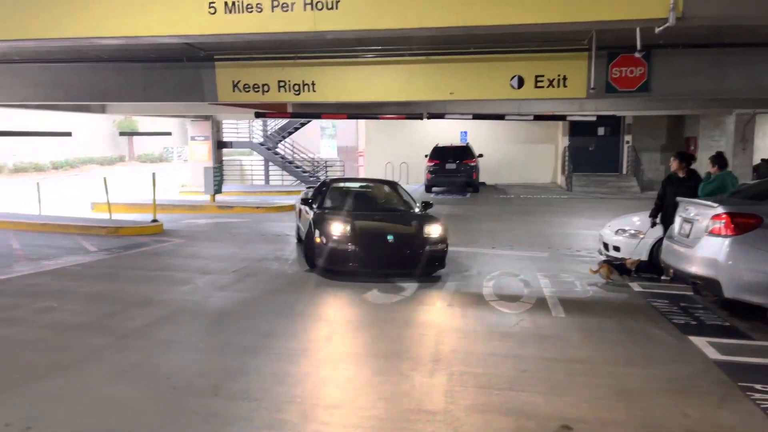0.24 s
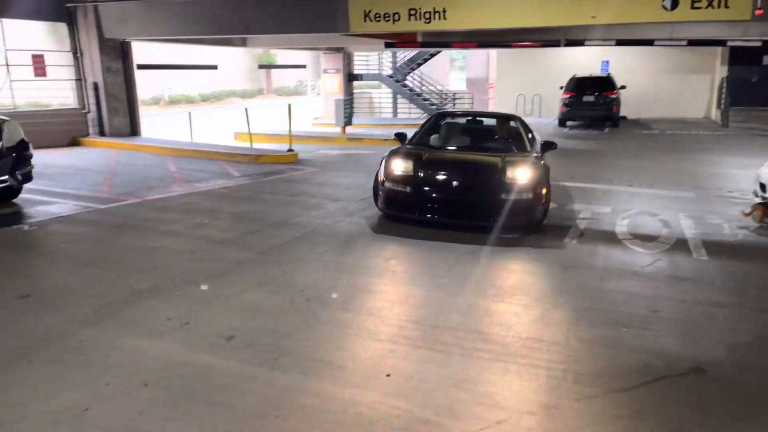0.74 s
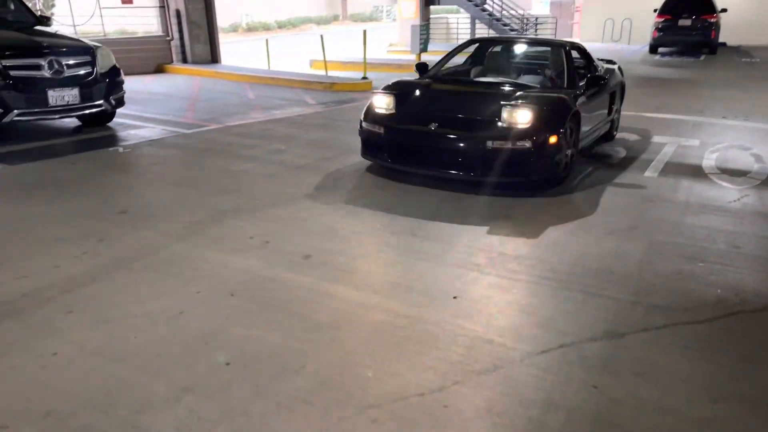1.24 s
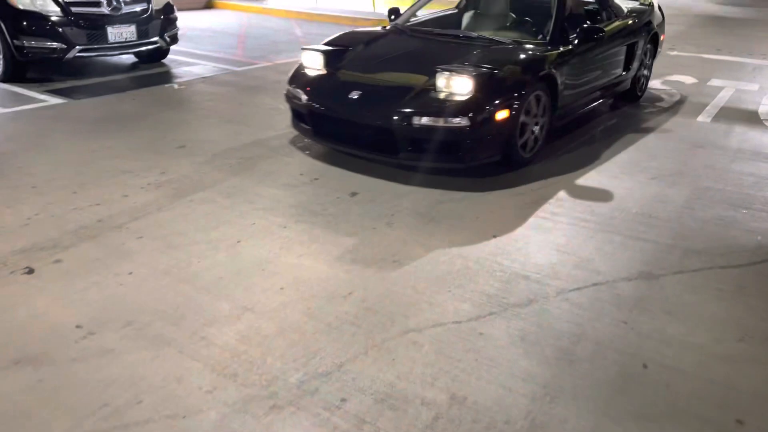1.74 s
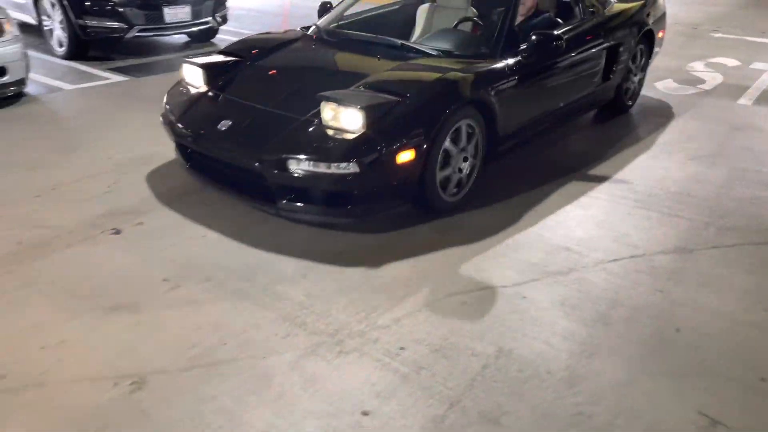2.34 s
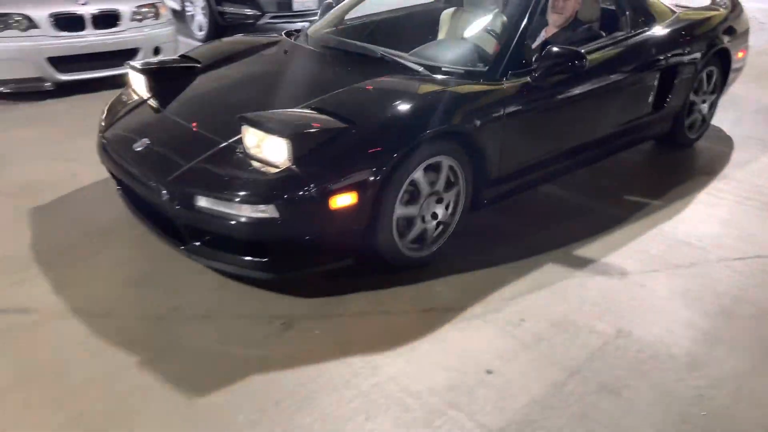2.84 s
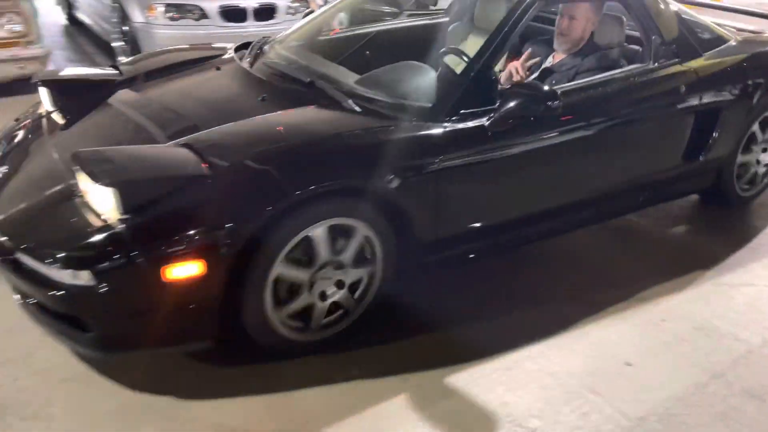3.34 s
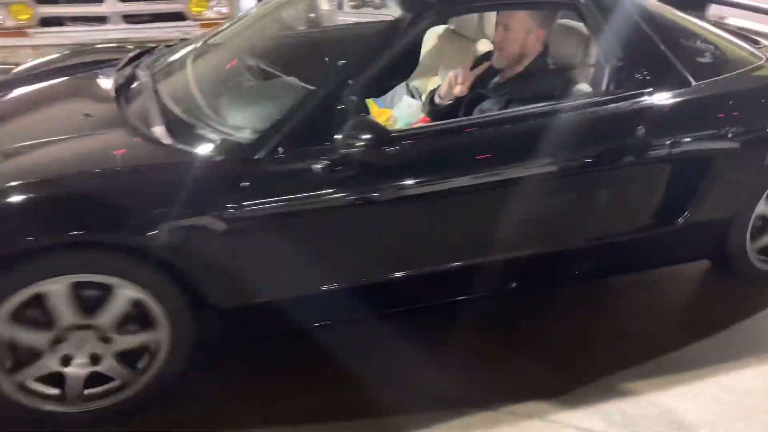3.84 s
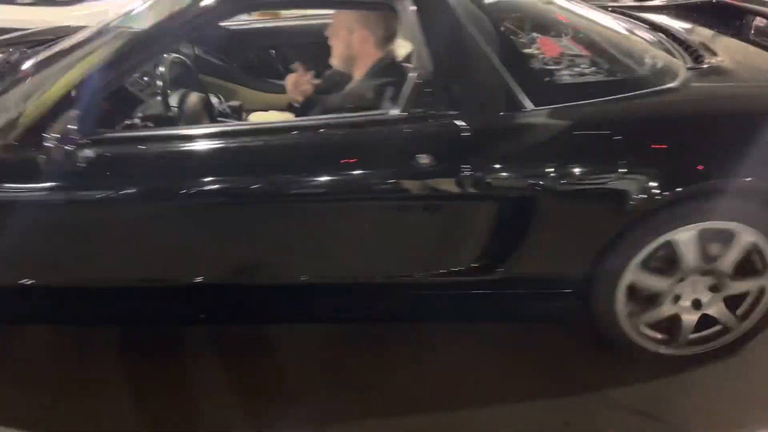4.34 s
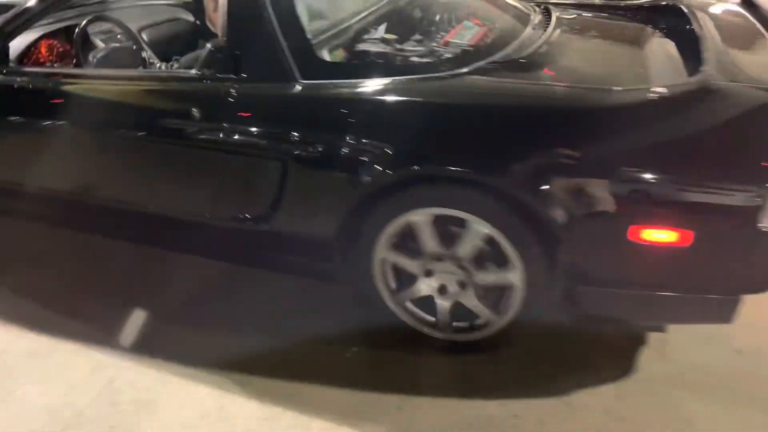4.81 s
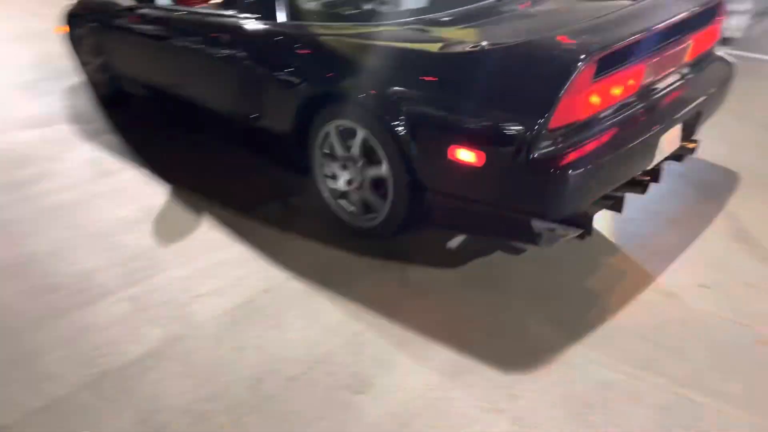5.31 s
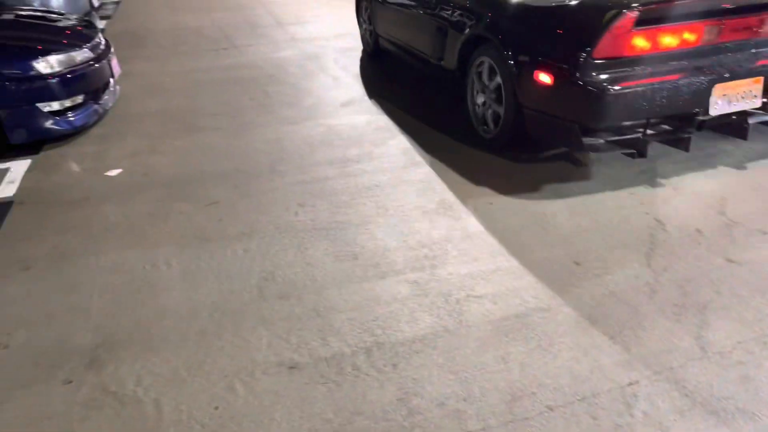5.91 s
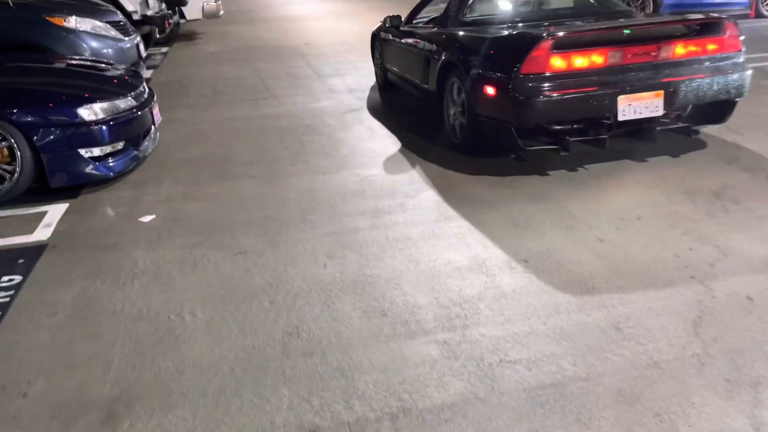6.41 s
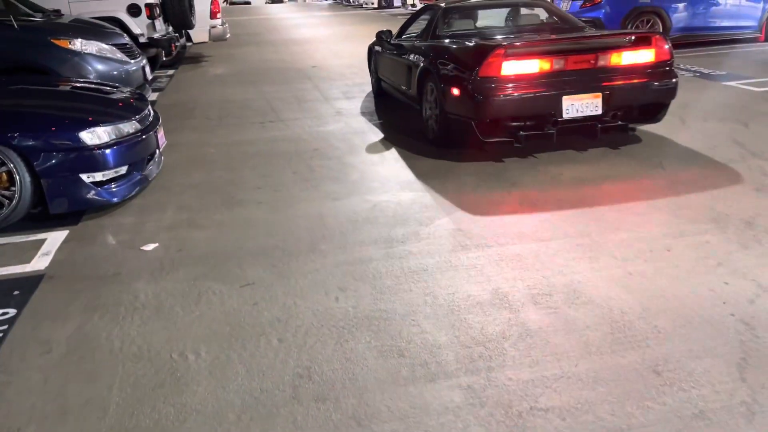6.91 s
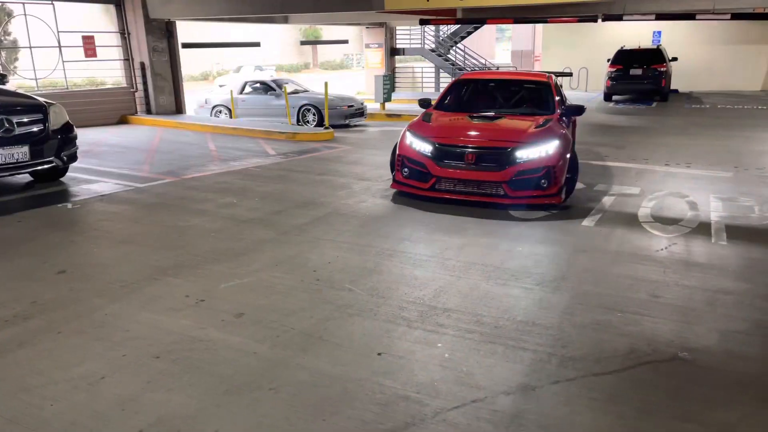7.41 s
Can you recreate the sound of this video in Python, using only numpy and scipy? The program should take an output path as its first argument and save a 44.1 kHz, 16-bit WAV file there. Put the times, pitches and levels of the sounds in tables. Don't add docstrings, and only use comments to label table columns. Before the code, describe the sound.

In a reverberant concrete parking garage, several engines idle in a deep, uneven drone while a low sports car approaches. A faint door slams far off. The exhaust boom and tyre hiss swell as the car passes close, its main note gliding up, then it surges away with a tiny tyre squeak. A click and a blink of silence end it; a quieter engine drone fades in. Handheld stereo microphone nearby.

```python
import sys
import numpy as np
from scipy import signal
from scipy.fft import rfft, irfft, next_fast_len
from scipy.io import wavfile

SR = 44100
rng = np.random.default_rng(int(sys.argv[2]) if len(sys.argv) > 2 else 0)


def wrap_up_sound(samples):
    columns = np.atleast_2d(samples).T
    tamed = np.clip(columns, -1, 1)
    steps = np.round(tamed * 32767).astype(np.int16)
    wavfile.write(sys.argv[1], SR, steps)


def volts(x):
    e = np.asarray(x, float) / 20
    return 10 ** e


N = 337806
CUT_S, RETURN_S, FADE_S = 7.07105, 7.132, 0.014
PORT_LAG_S = 0.00045


def rms_one(x):
    return x / np.sqrt(np.mean(x ** 2) + 1e-20)


def colour(x, points):
    size = next_fast_len(N + SR)
    hz = np.arange(size // 2 + 1) * SR / size + 1e-3
    points_hz, points_db = np.transpose(points)
    gain = volts(np.interp(np.log(hz), np.log(points_hz), points_db))
    return irfft(rfft(x, size) * gain, size)[..., :N]


def band(x, low_hz, high_hz, order=3):
    return signal.sosfilt(signal.butter(order, [low_hz, high_hz], "band", fs=SR, output="sos"), x)


def drift(rate):
    r = np.exp(-80 * np.pi * rate / SR)
    chance = rng.standard_normal(N // 40 + 4002)
    slow = signal.lfilter([1], [1, -2 * r, r * r], chance)[4000:]
    return np.interp(np.arange(N) / 40, np.arange(len(slow)), rms_one(slow - slow.mean()))


# t/s, nearness level/dB, load level/dB
DRIVE = [(0, 0, 1.5), (1, 0.5, 1), (1.9, 1.5, -3), (2.55, 2, -0.5), (3.0, 3, -1), (3.5, 4, 3.5),
         (4.17, 6.5, 4.5), (4.27, 9.5, 4.5), (4.65, 9.5, 5), (5.1, 9, 5), (5.6, 9, 5), (6.1, 9, 1),
         (6.2, 11.5, 5), (6.5, 11.5, 3.5), (7.07, 11, 4), (7.13, 1.5, 0), (7.3, 1.5, 1), (7.66, -0.5, 0.5)]


def drive():
    s, near_db, load_db = np.transpose(DRIVE)
    t = np.arange(N) / SR
    return np.interp(t, s, near_db), np.interp(t, s, load_db)


def garage(x, direct, t60_s=1.39):
    t = np.arange(int(1.5 * SR)) / SR
    echoes = rng.standard_normal((2, len(t))) * volts(-60 * t / t60_s)
    echoes /= np.sqrt(np.sum(echoes ** 2, axis=1, keepdims=True))
    echoes[0, 0] += direct
    looped = np.concatenate([x[-len(t):], x])
    return signal.fftconvolve(looped[None], echoes, axes=1)[:, len(t):len(t) + N]


def door_slam():
    start_s, rise_s, level_db, t60_s = 0.924, 0.01, -40, 0.7
    t = np.arange(N) / SR - start_s
    dying = np.clip(t / rise_s, 0, 1) * volts(level_db - 60 * np.maximum(t, 0) / t60_s)
    burst = band(rng.standard_normal((2, N)), 210, 3700, order=1)
    burst = signal.lfilter([1], [1, -0.9], burst)
    burst = signal.lfilter([1], [1, -0.8], burst)
    return dying * rms_one(burst)


# t/s, f/Hz, length/s, level/dB
SQUEAKS = [
    (5.717, 1436, 0.046, -45),
    (7.036, 1343, .045, -42),
]


def tyre_squeaks():
    t, out = np.arange(N) / SR, np.zeros((2, N))
    for s, hz, length, level_db in SQUEAKS:
        shape = np.sin(np.pi * np.clip((t - s) / length, 0, 1)) ** 0.9
        squeal = np.sin(2 * np.pi * hz * t + 0.85 * drift(30))
        out += volts(level_db) * shape * squeal * [[1], [0.8]]
    return out


# f/Hz, level/dB per Hz
HISS = [(350, -30), (600, -4), (963, -7.5), (1350, -13), (2220, -16.5), (3370, -14.5), (4740, -30.5),
        (7350, -27.5), (8300, -26), (10800, -48.5), (18300, -120)]
# f/Hz, level/dB per Hz
HISS_SIDE = [(350, -30), (600, -2), (790, -7), (1820, -11), (2890, -13), (4440, -23.5), (5590, -29),
             (8300, -25.5), (10800, -49), (18300, -120)]


def hiss(patchy_db):
    hiss_db = -57 + drive()[0]
    mean_db = hiss_db.mean()
    white, right = rng.standard_normal((2, N)), band(rng.standard_normal(N), 630, 4200, order=1)
    left = np.roll(right, round(PORT_LAG_S * SR))
    white += 0.8 * np.array([left + right, left - right])
    both = np.array([colour(white[0], HISS[1:-2]), volts(-3.0) * colour(white[1], HISS_SIDE[1:-2])])
    both /= np.std(band(both[0], 1500, 8000))
    out = 0
    for low, high, follows, trim_db in [(665, 1210, 0.39, 4.0), (1470, 5050, 0.72, -1.3),
                                        (5240, 8400, 0.86, 4.5), (8750, 15500, 1.15, -8.0)]:
        near_db = mean_db + follows * (hiss_db - mean_db)
        out = out + volts(near_db + trim_db + patchy_db * drift(13)) * band(both, low, high)
    return out


def sing(rows, waver_rad=0.32, side_db=-17.0):
    swell_s, fall_s, flutter_db = 0.09, 0.09, 2.2
    s, pitch, level = np.transpose(rows)
    on = slice(max(int((s[0] - swell_s / 2) * SR), 0), min(int((s[-1] + fall_s / 2) * SR), N))
    t = np.arange(on.start, on.stop) / SR
    hz = np.interp(t, s, pitch)
    level_db = np.interp(t, s, level) + flutter_db * drift(5)[on]
    inside = np.clip(np.minimum((t - s[0]) / swell_s, (s[-1] - t) / fall_s) + 0.5, 0, 1)
    loudness = np.sqrt(2) * np.sin(inside * np.pi / 2) ** 2 * volts(level_db)
    waver = waver_rad * (hz / 130) ** 0.9 * drift(7.6)[on]
    phase = 2 * np.pi * np.cumsum(hz) / SR + waver + rng.uniform(0, 2 * np.pi)
    slant = rng.uniform(0, 2 * np.pi)
    out = np.zeros((2, N))
    out[:, on] = loudness * np.sin([phase, phase + slant]) * [[1], [volts(side_db)]]
    return out


# f/Hz, level/dB
IDLE_HUM = [
    (204, -38),
    (268, -44),
    (449, -54),
    (178, -39),
]


def idle_hum():
    return sum(sing([(-3, hz, db), (CUT_S, hz, db)]) for hz, db in IDLE_HUM)


# four-stroke cycles f/Hz, level/dB
ENGINES = [
    (6.8, 4),
    (9.3, -1.0),
    (14.5, -4.5),
]


def firings(uneven_db, wander, rough):
    out = np.zeros(N)
    for cycles, level_db in ENGINES:
        firing_hz = 6 * cycles * (1 + wander * drift(0.5))
        count = np.floor(np.cumsum(firing_hz) / SR).astype(int)
        fires = np.diff(count, prepend=0) > 0
        strength_db = rng.normal(0, 1, 6)[count % 6] * uneven_db + rng.normal(0, 2.22, N)
        out += volts(level_db) * rms_one(fires * volts(strength_db))
    return rms_one(out - out.mean()) + rough * rng.standard_normal(N)


# f/Hz, level/dB per Hz
EXHAUST = [(15, -49), (25, -47), (48, -10), (87, -10.5), (134, 1), (149, -5), (173, -13.5), (227, -23.5),
           (275, -21), (401, -28), (445, -29.5), (525, -32), (900, -45.5), (1170, -76.5), (1980, -120)]
# f/Hz, level/dB per Hz
EXHAUST_SIDE = [(15, -52), (25, -34), (48, -19.5), (134, -2.5), (233, -19.5), (275, -10.5), (525, -21.5),
                (900, -24), (1170, -58.5), (1980, -120)]
# low f/Hz, high f/Hz, level/dB, share of nearness, share of load
REGISTERS = [
    (20, 90.3, -28.5, 0.05, .3),
    (92.1, 185.6, -23, .3, .9),
    (185, 673, -34.5, .3, 1.0),
]


def drone():
    near_db, load_db = drive()
    front, side = garage(firings(uneven_db=7.0, wander=0.03, rough=0.89), direct=0.61)
    both = np.array([colour(front, EXHAUST), volts(-15.5) * colour(side, EXHAUST_SIDE)])
    out = 0
    for low, high, level_db, near, load in REGISTERS:
        part = band(both, low, high)
        out = out + volts(level_db + near * near_db + load * load_db) * part / np.std(part[0])
    return out


# t/s, length/s, first f/Hz, last f/Hz, level/dB
DEEP_NOTES = [(0.07, 0.42, 78.4, 77.3, -30.5), (0.473, 0.099, 78.55, 78, -27), (0.897, 0.18, 57, 55.3, -24),
              (1.529, 0.16, 103.9, 109, -26.5), (1.715, 0.16, 104, 102, -25.5),
              (2.0, 0.33, 103.7, 108.7, -39), (2.594, .32, 84.1, 85, -27), (2.662, .4, 59.1, 61.4, -19.5),
              (3.102, 0.3, 64.7, 59.9, -18), (3.65, 0.29, 46, 48.5, -24.5), (4.098, 0.43, 56.7, 57.2, -26),
              (4.415, .58, 56.4, 60, -17.5), (4.553, .55, 107.7, 105.6, -29), (5.04, .5, 56, 53.7, -31),
              (5.725, 0.46, 68.4, 63, -23), (6.148, .16, 64, 69.3, -15.5),
              (6.143, .55, 105.2, 111.6, -19.5), (6.373, 0.16, 68, 65.8, -11.5),
              (6.631, 0.15, 70.7, 72.5, -19), (6.743, .4, 106.8, 106.7, -23.5),
              (6.817, 0.26, 83, 83.8, -20), (7.29, 0.17, 66.9, 69.7, -32), (2.051, 0.48, 62, 60.9, -32),
              (5.0, 0.36, 90.6, 91, -31)]
# t/s, length/s, first f/Hz, last f/Hz, level/dB
BOOM_NOTES = [(-.05, .28, 145.3, 143.1, -22), (0.417, 0.384, 128, 127.3, -27.5),
              (1.044, .3, 124.6, 133.1, -27.5), (1.254, 0.48, 147.9, 145.3, -34),
              (1.99, 0.51, 145, 147.7, -27), (2.6, 0.22, 139.2, 147.2, -26),
              (2.793, 0.57, 142, 138.1, -20.5), (2.7, .45, 120.4, 117.2, -26),
              (3.231, 0.18, 115.8, 123.2, -18), (3.388, .55, 148.7, 138.4, -17),
              (4.988, .22, 127, 122.2, -24), (5.335, 0.27, 129.5, 131.5, -12),
              (5.703, 0.35, 130, 127.3, -24), (6.166, .33, 140.2, 133, -14),
              (6.194, 0.34, 180.3, 174.3, -24), (6.518, .13, 131, 124, -10.5),
              (6.593, 0.3, 143, 135.8, -12), (6.68, 0.39, 122.2, 123.3, -16),
              (6.879, 0.22, 164.3, 161.8, -17.5), (7.163, 0.11, 122.9, 127.6, -25),
              (7.2, 0.18, 166.6, 166.5, -25.5), (7.473, .3, 124.5, 126.2, -22)]
# t/s, length/s, first f/Hz, last f/Hz, level/dB
OVERTONES = [(.15, 0.23, 292, 296.6, -37.5), (3.576, 0.3, 195.7, 200.8, -29.5),
             (4.27, 0.28, 315, 317.5, -34.5), (4.882, 0.48, 454, 449.4, -36.5),
             (4.934, 0.28, 321, 323, -32), (5.52, .36, 451, 450.4, -40), (6.127, .22, 205.1, 205, -29.5),
             (6.19, .22, 289.5, 280, -35), (6.89, 0.18, 267.3, 275.6, -30), (7.406, .28, 263.5, 271.4, -45),
             (3.599, 0.18, 248.6, 242, -35.5), (4.45, 0.14, 203.7, 206, -31.5),
             (3.501, 0.38, 283.4, 281.5, -38)]


def exhaust_notes():
    out = np.zeros((2, N))
    for s, length, first, last, db in [*DEEP_NOTES, *BOOM_NOTES, *OVERTONES]:
        middle = (s + length / 2, (first + last) / 2, db)
        out += sing([(s, first, db - 3), middle, (s + length, last, db - 3)])
    return out


# t/s, f/Hz, level/dB
ABREAST = [
    (3.45, 123.3, -17),
    (3.7, 128.3, -18),
    (4.0, 132.7, -9.5),
    (4.15, 136.5, -15.5),
    (4.4, 142.7, -18),
    (4.55, 147.8, -22.5),
    (4.7, 150, -18.5),
    (5.25, 144.1, -17),
    (5.45, 147.7, -25),
]


def car_abreast():
    return sing(ABREAST)


def scene():
    bass = idle_hum() + drone() + exhaust_notes() + car_abreast()
    cut, cycle = int(CUT_S * SR), SR // 120
    nearby = bass[0, cut - cycle // 2:cut + cycle // 2]
    late = cycle // 2 - np.argmin(abs(nearby + 0.19))
    bass = bass[:, np.clip(np.arange(N) - late, 0, N - 1)]
    bass[1] -= 0.7 * PORT_LAG_S / 2 * SR * np.gradient(bass[0])
    front, side = door_slam() + tyre_squeaks() + hiss(patchy_db=0.84) + bass
    return np.array([front + side, front - side])


def top_cut(x):
    return signal.sosfilt(signal.butter(12, 14700, fs=SR, output="sos"), x)


# f/Hz, left minus right level/dB
LEAN = [(200, 1.0), (650, -.5), (1180, 1.5), (2140, 5), (3600, 4.5), (5600, 2.2), (7800, -.5), (12800, 0)]


def record(dry):
    half = np.array(LEAN) * [1, 0.5]
    left, right = colour(dry[0], half), colour(dry[1], half * [1, -1])
    front_notch = signal.butter(2, [8300, 9650], "stop", fs=SR, output="sos")
    front = signal.sosfiltfilt(front_notch, (left + right) / 2)
    front = signal.sosfiltfilt(signal.butter(6, 13300, fs=SR, output="sos"), front)
    side_notch = signal.cheby2(3, 20, [10900, 12500], "stop", fs=SR, output="sos")
    side = signal.sosfiltfilt(side_notch, (left - right) / 2)
    both = np.array([front + side, front - side])
    both /= (1 + both ** 4) ** 0.25
    t = np.arange(N) / SR
    scene_change = np.where(t < CUT_S, 1, np.clip((t - RETURN_S) / FADE_S, 0, 1))
    return top_cut(both * scene_change)


dry = scene()
out = record(dry)
wrap_up_sound(out)
```